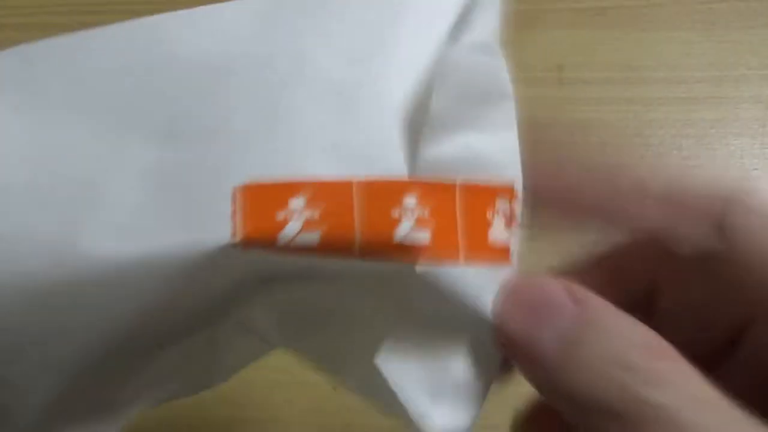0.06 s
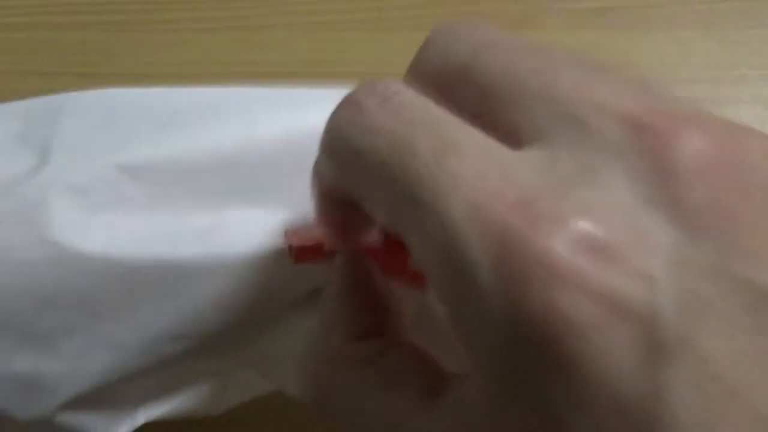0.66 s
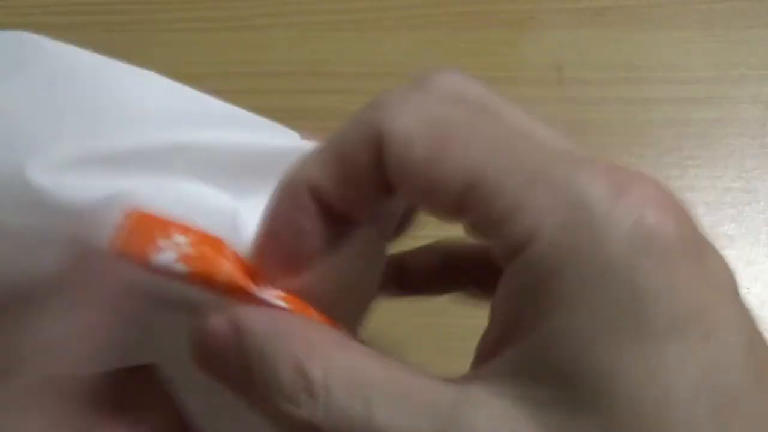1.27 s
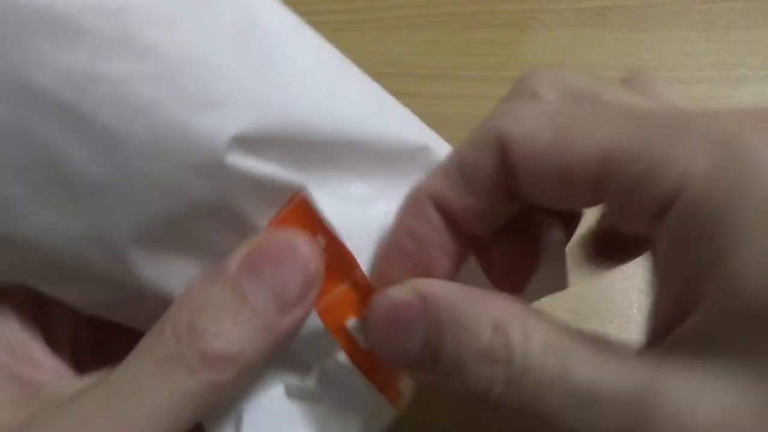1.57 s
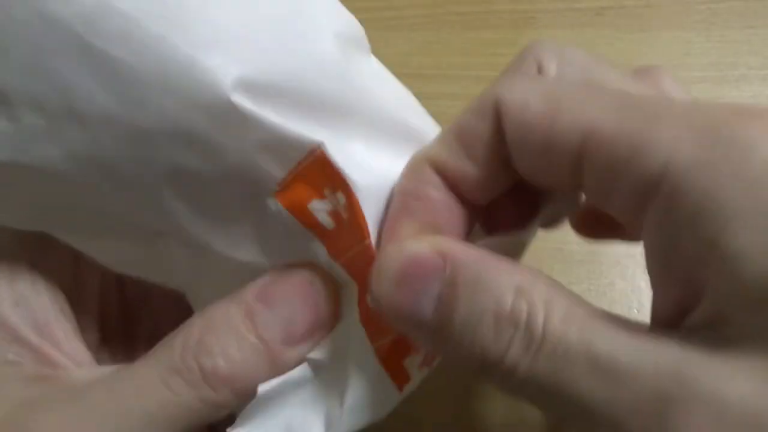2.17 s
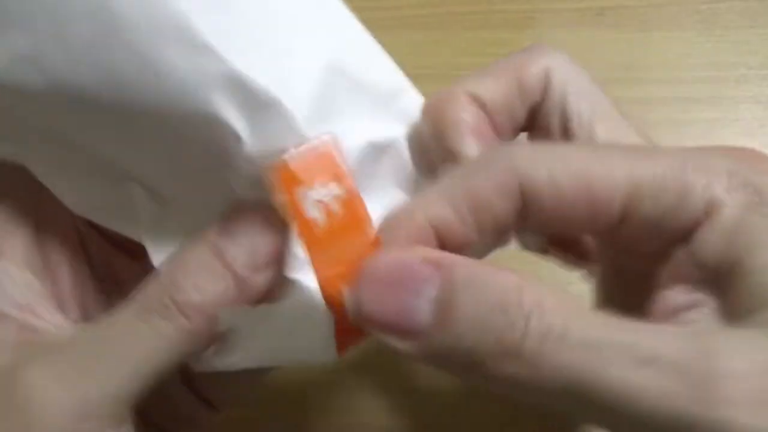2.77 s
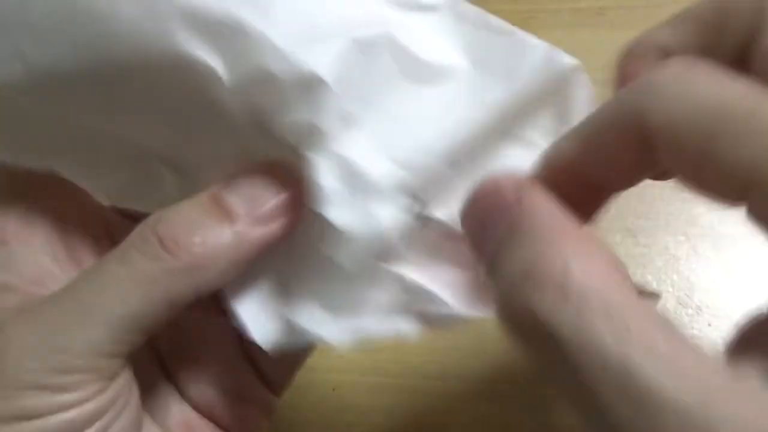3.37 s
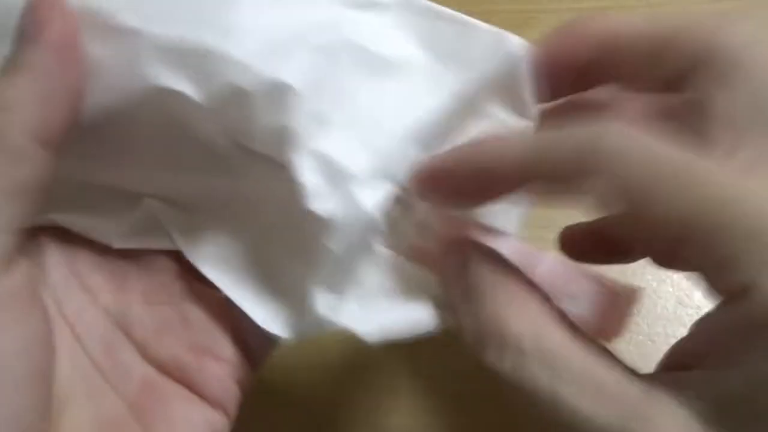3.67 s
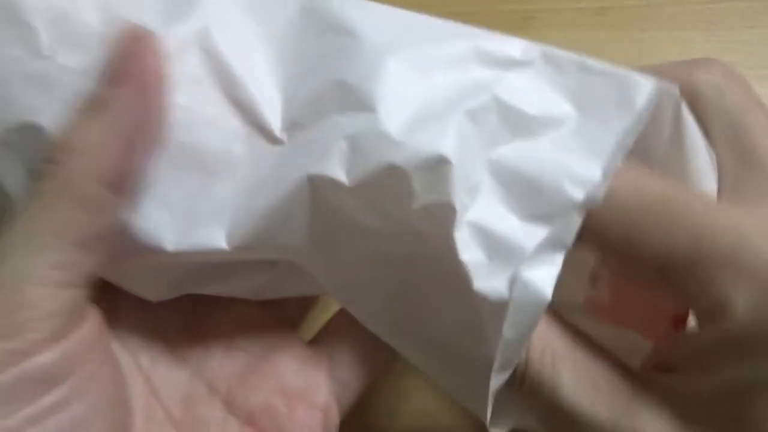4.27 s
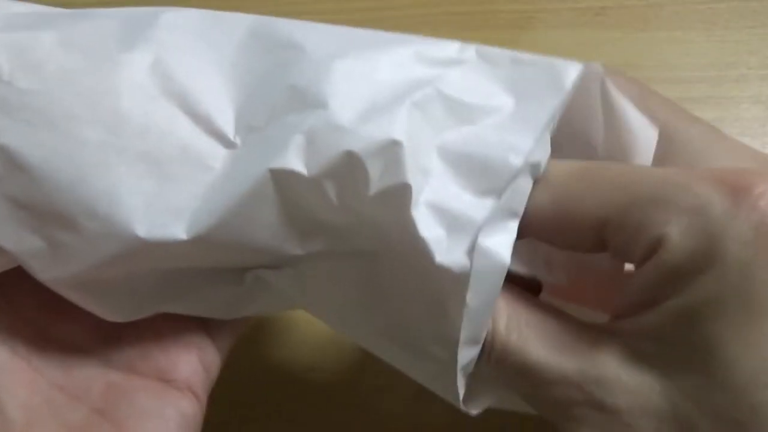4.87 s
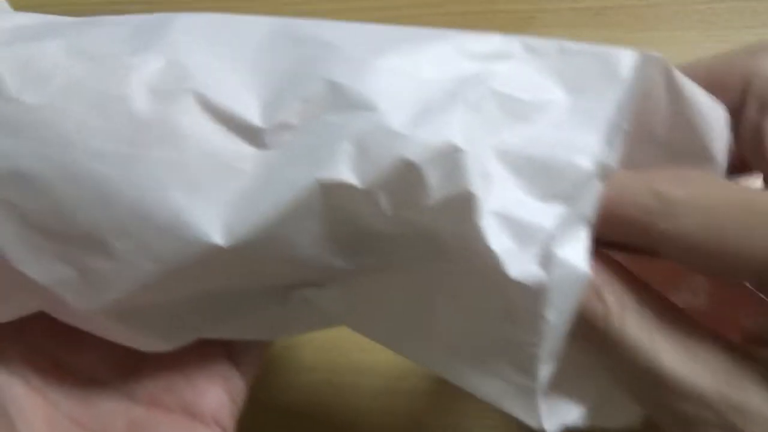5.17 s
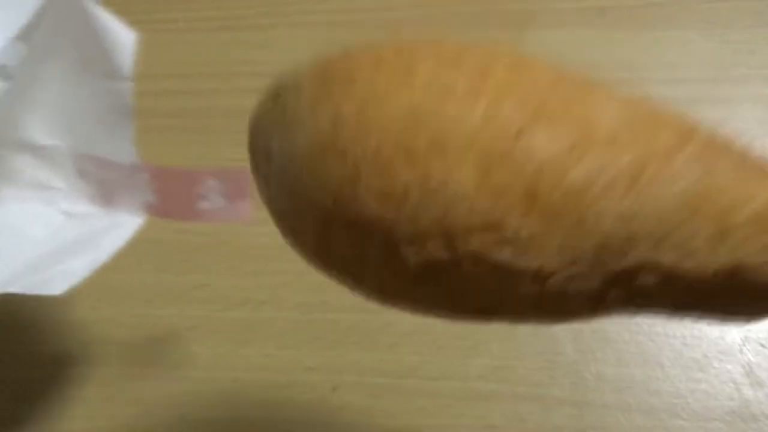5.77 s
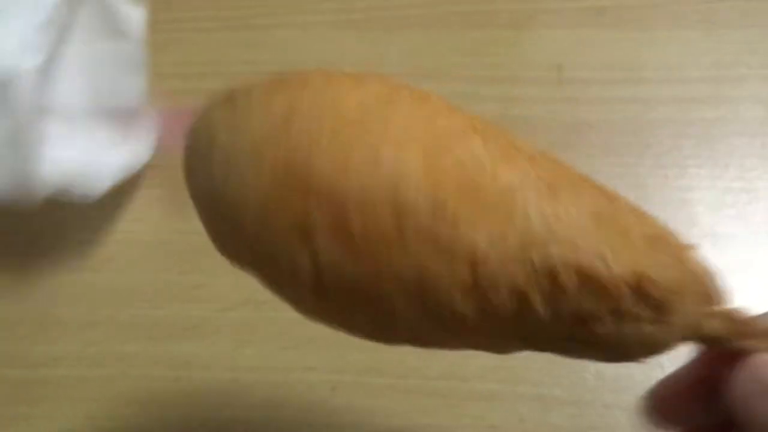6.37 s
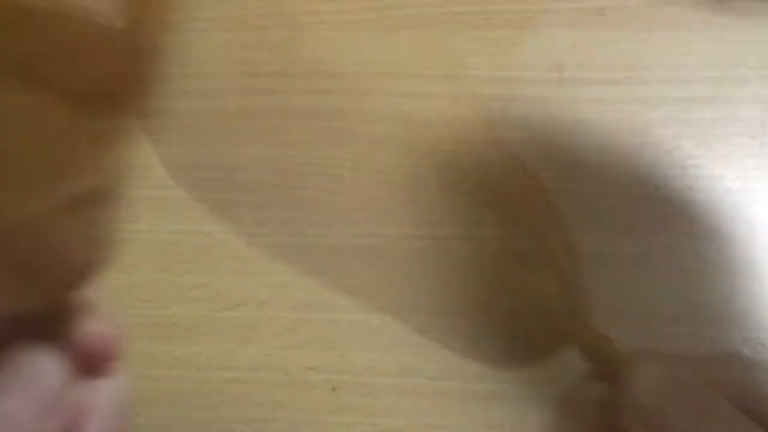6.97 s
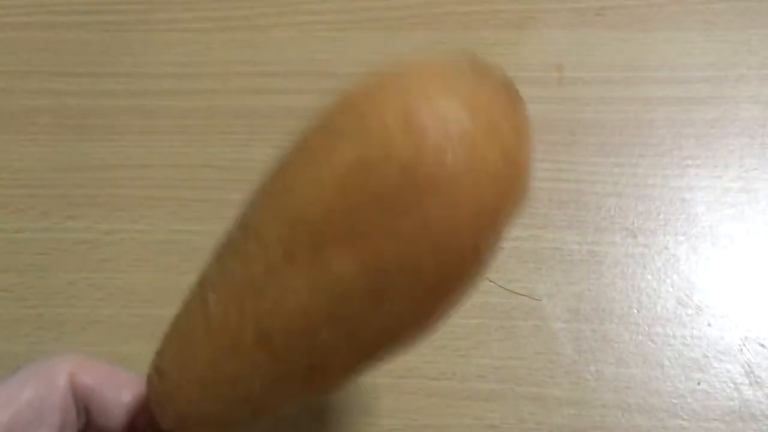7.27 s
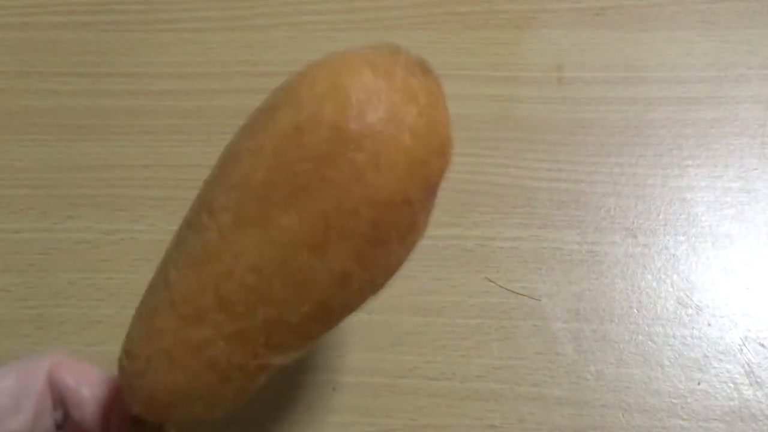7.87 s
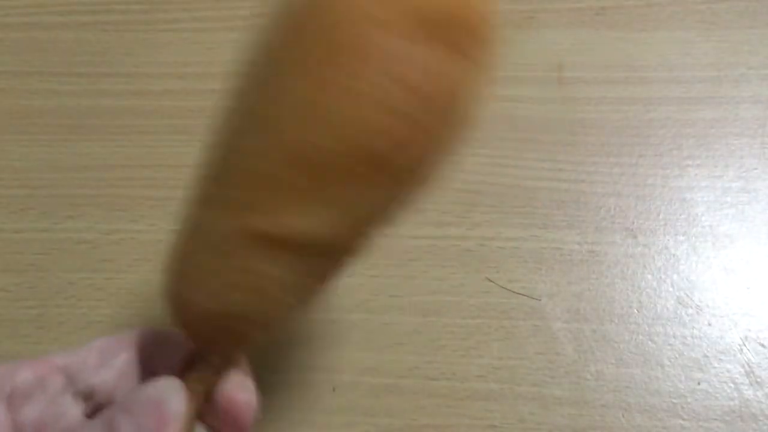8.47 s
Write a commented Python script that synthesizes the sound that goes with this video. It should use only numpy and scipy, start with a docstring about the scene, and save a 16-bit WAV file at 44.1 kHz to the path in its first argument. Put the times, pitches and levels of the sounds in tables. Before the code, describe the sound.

From the start, fingers handle a paper bag close to the microphone in a small quiet room. Uneven bursts of crackle and rubbing hiss are dotted with sharp crease snaps, loudest around 0.5 to 1.3 seconds, and the half-empty bag gives soft hollow booms. From about 2.6 to 2.9 seconds tape peels off in tiny jerks. The rustling eases briefly, then picks up near 3.6 seconds as the bag is opened. Around 4.8 to 5.2 seconds a finger stutters over the paper inside. At 5.5 seconds a snack on a stick slides out in a loud, short rush with a puff of air. The bag settles with a few ticks from 6 to 7 seconds, with a light knock on the wooden table at 6.4. Soft bumps follow near 7.3 and 8.2 seconds, while fingers shift faintly on the stick over low room rumble.

```python
"""In a small quiet room, close to a phone, fingers feel for the tape on a paper bag. Each movement stirs
crackle and hiss, creases snap one by one, and the half-empty bag booms. The tape peels off in tiny jerks,
the bag is opened, a finger stutters over the paper inside, and a snack on a stick slides out in a rush.
Then the bag settles with a few ticks, fingers shift on the stick, and a light knock and soft bumps
sound on the table."""
import sys
import numpy as np
from scipy import signal
from scipy.fft import rfft, irfft, next_fast_len
from scipy.io import wavfile
from scipy.ndimage import uniform_filter1d

SR = 44100
rng = np.random.default_rng(int(sys.argv[2]) if len(sys.argv) > 2 else 0)


def store_wav(level_fs):
    """Save 16-bit WAV to argv[1]."""
    pcm = np.round(np.clip(np.atleast_2d(level_fs), -1, 1) * 32767)
    wavfile.write(sys.argv[1], SR, pcm.T.astype(np.int16))


N = 375291
TIME = np.arange(N) / SR
TOP_HZ = 15900  # the highest pitch the phone keeps


def gain(db):
    """Turn decibels into a number to multiply by."""
    return 10 ** (np.asarray(db) / 20)


def curves(table):
    """Join a table's rows with straight lines in time, one curve for each column after the first."""
    times, *columns = np.transpose(table)
    return [np.interp(TIME, times, column) for column in columns]


def unit(x):
    """Scale a sound to an average (rms) level of 1."""
    return x / np.sqrt(np.mean(x ** 2) + 1e-20)


def burst(x):
    """Give a short sound the energy of 5 ms at level 1."""
    return x / np.sqrt(np.sum(x ** 2) / (.005 * SR) + 1e-20)


def even(x, span_s):
    """Hold the running level near 1 while keeping the fine spikes."""
    size = max(int(span_s * SR), 8)
    power = uniform_filter1d(uniform_filter1d(x ** 2, size), size)
    return x / np.sqrt(np.abs(power) + 1e-12)


def add(out, start, x):
    """Mix x into out, from start in seconds."""
    i = max(int(start * SR), 0)
    out[i:i + len(x)] += x[:max(N - i, 0)]


def band(x, low_hz, high_hz, order=2):
    """Keep the part of a sound between two pitches."""
    sos = signal.butter(order, [low_hz, min(high_hz, .48 * SR)], "band", fs=SR, output="sos")
    return signal.sosfilt(sos, x + 1e-18)


def db_at(colour, hz):
    """Look up how strong a tone colour is at a given pitch."""
    pitches, db = np.transpose(colour)
    return np.interp(np.log(hz), np.log(pitches), db)


def noise(colour):
    """Noise at level 1 with a given tone colour, falling away beyond the table's ends."""
    size = next_fast_len(N)
    hz = np.arange(size // 2 + 1) * SR / size + 1
    ends = 1 / np.sqrt((1 + (colour[0][0] / hz) ** 6) * (1 + (hz / colour[-1][0] / 2) ** 8))
    spectrum = rfft(rng.standard_normal(size)) * gain(db_at(colour, hz)) * ends
    return unit(irfft(spectrum, size)[:N])


def fade(t, t60):
    """Die away by 60 dB in t60 seconds, the fade time."""
    return np.exp(-np.log(1000) * t / t60)


def ring(t, hz, t60):
    """One tone that is struck and dies away."""
    return np.sin(2 * np.pi * hz * t) * fade(t, t60)


def wander(rate):
    """A random curve, roughly between -1 and 1, that turns rate times a second."""
    points = rng.standard_normal(int(N / SR * rate) + 2)
    return 1.2 * np.interp(TIME * rate, np.arange(len(points)), points)


# The tone colour of the quiet room. Each row: pitch in Hz, strength in dB.
ROOM_COLOUR = [(25, -3), (60, 0), (90, -0.5), (130, -7), (280, -6), (450, -18), (900, -21.5), (1600, -30.5),
               (4900, -40), (5350, -28.5), (5800, -38.5), (15000, -38)]
# How loud the background is. Each row: time in seconds, level in dB.
BACKGROUND_LEVELS = [(0, -60.5), (5.8, -68.5), (6.3, -61.5), (7.1, -59.5), (8.5, -57.5)]
def background():
    """Low room rumble, faint hiss and a thin electronic whine."""
    db, = curves(BACKGROUND_LEVELS)
    rumble = noise(ROOM_COLOUR) * gain(0.51 * wander(6.9))
    whine = np.sin(2 * np.pi * 15734 * TIME)
    return gain(db) * (rumble + gain(-19.5) * whine)


# Paper rustling while it is just held. Each row: time in seconds, level in dB.
HOLDING_LEVELS = [(0, -86), (.05, -75), (.1, -43.5), (1.4, -45.5), (2.0, -42.5), (3.2, -53), (3.32, -55),
                  (3.4, -46.5), (4.25, -53), (4.35, -52.5), (4.45, -39.5), (5.26, -48), (5.33, -61.5),
                  (5.42, -43.5), (5.75, -75), (7.9, -75.5), (8.2, -66), (8.5, -67.5)]
# The hands find the tape, lift the bag, peel, open, grope inside and move the bag aside.
# Each row: start in seconds, length in seconds, level in dB, swell from start to end in dB,
# brightness (higher means more treble), boom in dB relative to the level, share of crackle from 0 to 1.
HAND_STROKES = [ (0.063, 0.027, -39.5, 6, 3, -16, 0.77), (0.129, 0.064, -29.5, 8, 2.5, -14, 0.6),
                (0.222, 0.02, -25.5, 5.5, 1.5, -20, 0.45), (0.317, 0.055, -24, -4, 0, -8.5, 0.5),
                (0.394, 0.052, -35, 2, 4, -16, 0.8), (0.464, 0.073, -30, -2, -1, -11, 0.47),
                (0.561, 0.056, -26.5, -1.5, 1, -12.5, 0.63), (0.638, 0.036, -23.5, -4.5, 3, -18, 0.65),
                (0.746, 0.072, -24, 4, 2, -13.5, .6), (0.833, 0.098, -29, 7.5, 4.5, -11, 0.7),
                (0.978, .06, -25.5, 2.5, 2.5, -10.5, 0.16), (1.046, .07, -22, -0.5, 3.5, -18, 0.48),
                (1.153, 0.11, -34, -1, 2, -12, 0.4), (1.293, 0.018, -20.5, -9, 5, -16.5, 0.2),
                (1.342, 0.15, -30.5, -2.5, 2.5, -18.5, 0.5), (1.55, 0.089, -29, 4, 1.5, -22, 0.6),
                (1.672, 0.37, -38, -15.5, 4, -17.5, 0.96), (1.853, 0.044, -35, 0, 5, -13, .6),
                (2.008, 0.12, -33, -4.5, 4.5, -18, 0.82), (2.095, 0.12, -38, 12.5, 1.5, -23, 0.3),
                (2.29, 0.05, -38, 2, 2.5, -22, 0.6), (2.371, 0.057, -34, 12, 5, -13.5, 0.83),
                (2.477, 0.022, -27.5, -1, 1.5, -23, 0.97), (2.58, .045, -33, 2, -0.5, -20, 0.98),
                (2.656, 0.15, -27, 1, 2.5, -23, 0.55), (2.855, 0.013, -28.5, 4.5, 18, -25, 0.4),
                (2.89, 0.08, -38.5, 6, 8, -10.5, 0.4), (2.96, 0.035, -30.5, 8.5, 5.5, -22, 0.23),
                (3.055, 0.21, -38.5, -18, 2, -17, 0.75), (3.254, 0.018, -34.5, -7, 0, -31, 0.9),
                (3.345, 0.13, -40.5, 3, 4, -14, 0.33), (3.385, 0.016, -39.5, -10, -7, -6, .3),
                (3.545, 0.14, -41.5, 3, 5.5, -14, 0.1), (3.64, 0.17, -38, 2, 2, -13.5, 0.65),
                (3.787, 0.089, -31.5, 2, 3, -15.5, 0.45), (3.902, .04, -27.5, -2, 3.5, -13, 0.13),
                (3.967, .1, -28.5, -3, 1.5, -17, 0.38), (4.097, .11, -34.5, 3.5, 3, -8, 0.54),
                (4.231, 0.036, -43, 24, 0, -20, 0.94), (4.318, 0.013, -42, -5, 2, -16, 1),
                (4.376, .03, -40, -4, 3, -18, 0.4), (4.461, 0.26, -31.5, -3, 3, -16.5, 0.2),
                (4.919, 0.011, -40, -17, 11, -5, 1), (5.004, 0.035, -36.5, 3, 0, -4, 0.75),
                (5.057, 0.016, -29, 1, 6.5, -15, 0.6), (5.092, .11, -25, 2, 3.5, -19, .08),
                (5.345, 0.04, -36.5, 1, 1.5, -13.5, 0), (6.25, 0.26, -67, -1, 2, -10.5, .2),
                (6.583, .05, -60.5, 4, 8, -21, 0.4), (6.748, 0.075, -54.5, 2, 5, 0.5, 0.43),
                (6.887, 0.095, -62.5, -9.5, 7.5, 0, 0.9)]
# The snack slides out. Each row: time in seconds, level in dB, share of fast sliding from 0 to 1,
# level in dB of the air buffeting the microphone.
SNACK_PULL = [(5.425, -50.5, 0, -87), (5.478, -19.5, .5, -46.5), (5.507, -14.5, .7, -47.5),
              (5.548, -13.5, 1, -31), (5.586, -15.5, .6, -52.5), (5.618, -39.5, .4, -47.5),
              (5.72, -70, 0, -92)]
def hands(attack_s=0.0073, release_s=0.048, arch_db=1.5, creasing_db=-66):
    """Holding, pulling and strokes add up to four curves: level, brightness, boom and crackle share."""
    held_db, = curves(HOLDING_LEVELS)
    held = gain(held_db) ** 2
    pulling = (TIME > SNACK_PULL[0][0]) & (TIME < SNACK_PULL[-1][0])
    pull = pulling * gain(curves(SNACK_PULL)[0]) ** 2
    held_tone, pull_tone = [2.5, -9, 0.64], [1, -21.5, 0.28]  # brightness, boom, crackle share
    tone = np.outer(held_tone, held)
    tone[2] *= held_db > creasing_db  # a lighter touch only rubs and does not crackle
    tone += np.outer(pull_tone, pull)
    power = held + pull
    for start, length, db, swell_db, *stroke_tone in HAND_STROKES:
        near = slice(*np.searchsorted(TIME, [start - 2 * attack_s, start + length + 2 * release_s]))
        t = TIME[near] - start
        along = np.clip(t / length, 0, 1) - .5
        edges_db = 20 * (np.minimum(t, 0) / attack_s - np.maximum(t - length, 0) / release_s)
        stroke = gain(db + swell_db * along - arch_db * (2 * along) ** 2 + edges_db) ** 2
        power[near] += stroke
        tone[:, near] += np.outer(stroke_tone, stroke)
    catch_db = 0.97 * wander(90)  # the fingers catch and slip, so no movement is even
    return 10 * np.log10(power) + catch_db, *(tone / power)


# The tone colour of crackling paper. Each row: pitch in Hz, strength in dB.
CRACKLE_COLOUR = [(400, -5.5), (600, -8), (880, -4), (1400, -9), (2100, 3), (3200, -9), (4600, -1),
                  (7500, -6.5), (11000, -14.5), (15500, -12)]
def crackle(per_second=650, spread_db=10.0, focus_db=8, tail_s=0.036, tail_db=-8):
    """Countless tiny creases click, a few large among many small, each strongest near its own pitch."""
    count = int(per_second * N / SR)
    when, how_big, how_high = rng.random((count, 3)).T
    places = (when * (N - 1)).astype(int)
    sizes = gain(spread_db * np.minimum(-np.log(1 - how_big), 3))
    pitches = 600 * 24 ** how_high
    out = np.zeros(N)
    for hz in 460 * 2 ** (np.arange(11) / 2):  # half an octave apart
        octaves_away = np.minimum(np.abs(np.log2(hz / pitches)), 1.5)
        colour_db = -focus_db * octaves_away + 3 * rng.standard_normal(count)
        clicks = np.zeros(N)
        clicks[places] = sizes * gain(colour_db) * rng.choice([-1, 1], count)
        out += gain(db_at(CRACKLE_COLOUR, hz)) * band(clicks, hz / 2 ** .25, hz * 2 ** .25)
    # ripples scatter through the sheet and smear each click
    decay = np.exp(-2 * np.log(1000) / (tail_s * SR))
    smear = np.sqrt(signal.lfilter([1 - decay], [1, -decay], out ** 2)) * noise(CRACKLE_COLOUR)
    return even(out + gain(tail_db) * smear, span_s=.035)


# The tone colours of paper rubbing on paper, of fast sliding and of the bag's boom.
# Each row: pitch in Hz, strength in dB.
RUB_COLOUR = [(400, -13), (600, -6.5), (860, -1), (1400, -7), (2300, -3), (4800, -3.5), (8000, -5.5),
              (10500, -9), (12500, -14.5), (15500, -15)]
SLIDE_COLOUR = [(400, -7.5), (600, -4.5), (880, -2.5), (1400, -4.5), (2400, 0), (4500, 1.5), (8000, -1.5),
                (15500, -5.5)]
BOOM_COLOUR = [(50, -24.5), (90, -16), (150, -3.5), (235, 0), (330, -0.5), (450, -11.5)]
def rustle():
    """Crackle, rubbing hiss and boom follow the hands; fast sliding is a denser, brighter rush."""
    db, brightness, boom_db, crackling = hands()
    _, sliding, wind_db = curves(SNACK_PULL)
    crackling, sliding = np.clip(crackling, 0, 1), np.clip(sliding, 0, 1)
    hiss = unit(noise(RUB_COLOUR) * gain(3.4 * wander(420) + 1.9 * wander(70)))
    paper = np.sqrt(crackling) * crackle() + np.sqrt(1 - crackling) * hiss
    # brightness tips the balance between the lows and the highs
    lows = signal.sosfilt(signal.butter(1, 3500, fs=SR, output="sos"), paper)
    tilt = gain(1.4 * (brightness - 3.0))
    paper = (lows / tilt + (paper - lows) * tilt) / np.sqrt((tilt ** 2 + tilt ** -2) / 2)
    rush = unit(noise(SLIDE_COLOUR) * gain(2.0 * wander(900)))
    boom = unit(noise(BOOM_COLOUR) * gain(3.4 * wander(55)))
    wind = unit(band(rng.standard_normal(N), 45, 210))
    bag = np.sqrt(1 - sliding) * paper + np.sqrt(sliding) * rush + gain(boom_db) * boom
    return gain(db) * bag + gain(wind_db) * wind


# The creases that snap loudest. Each row: start in seconds, rough peak level in dB, pitch in Hz of the
# small patch of paper that rings, level in dB of the bag's flexing side.
CREASE_SNAPS = [(0.088, -24, 2320, -45.5), (0.1427, -11, 6330, -32.5), (0.1608, -9, 3000, -28.5),
                (0.19, -7, 4930, -43), (0.2088, -3.5, 4520, -34), (0.2274, -9, 3930, -35),
                (0.2325, -6, 3460, -45), (0.2373, -2.5, 4470, -33), (0.315, -11.5, 3396, -28),
                (0.3331, -6, 4300, -23), (0.3506, -4.5, 5160, -32), (0.377, -7.5, 4600, -22.5),
                (0.41, -4.5, 3110, -46), (0.4943, -6, 2920, -24.5), (0.5514, -8, 2270, -50),
                (0.571, 1, 4370, -46), (0.5796, 2.5, 4930, -29), (0.6, 2.5, 4630, -29),
                (0.6306, -6, 4630, -45), (0.6388, -6.5, 3340, -23.5), (0.6613, -2.5, 3520, -25),
                (0.6654, -4, 3274, -29), (0.6888, -12, 6250, -42), (0.7569, -6.5, 3400, -22),
                (0.7739, -3.5, 4760, -37), (0.7807, -4, 3220, -44), (0.7911, -4.5, 4100, -24),
                (0.8045, 0, 7220, -22), (0.8115, -2, 5370, -23), (0.84, -6, 8300, -36),
                (0.859, -1.5, 3530, -29), (0.9057, -3.5, 4430, -35), (0.9258, -6.5, 4100, -33),
                (0.9647, -5, 4160, -28), (0.999, 1.5, 6260, -23), (1.036, 2, 3260, -20.5),
                (1.0839, -4, 3330, -43), (1.0989, 1, 5300, -22), (1.1107, 0, 5850, -31),
                (1.1154, -4.5, 2570, -25), (1.1318, -3, 5270, -26), (1.1812, -9.5, 6560, -23.5),
                (1.1971, -10.5, 4470, -27), (1.2909, -23, 3550, -32), (1.296, -4.5, 4500, -22),
                (1.3369, -9, 2280, -46), (1.377, -6, 3450, -23.5), (1.4785, -13.5, 5900, -34),
                (1.4856, -9.5, 5030, -30), (1.5899, -11, 2620, -31.5), (1.6065, -7, 5400, -32),
                (1.6125, -8, 5600, -24.5), (1.6766, -9, 3960, -37), (1.7274, -19, 7360, -44),
                (1.7527, -6.5, 6150, -25.5), (1.7913, -7.5, 4280, -42), (1.8198, -11.5, 5750, -36),
                (1.8469, -14, 2630, -45), (1.8851, -19, 2420, -46), (1.9203, -5.5, 5760, -33),
                (1.9454, -4, 4170, -23.5), (1.9948, -17, 2500, -38), (2.024, -10.5, 2320, -28),
                (2.0452, -11, 5000, -33), (2.0784, -8.5, 4150, -51), (2.1342, -17, 3900, -25),
                (2.2005, -7, 4800, -31.5), (2.2576, -17.5, 4350, -45.5), (2.3018, -14.5, 4200, -33),
                (2.3174, -7.5, 5300, -29), (2.3341, -13.5, 6160, -36), (2.396, -11, 4490, -29),
                (2.4238, -7.5, 3560, -28.5), (2.4548, -12, 3700, -31.5), (2.5015, -3.5, 7020, -30),
                (2.5316, -11, 3700, -60), (2.601, -8, 5030, -39), (2.666, -10, 3600, -29),
                (2.6845, -7.5, 4830, -31), (2.7621, -5.5, 3500, -22), (2.7746, -5.5, 2450, -28),
                (2.786, -3.5, 6670, -21), (2.7911, -5.5, 4160, -24), (2.8643, -17, 4410, -28),
                (2.9143, -14, 8300, -52), (2.9713, -10.5, 5060, -41), (3.0217, -20.5, 2580, -31.5),
                (3.0928, -13.5, 5600, -35), (3.1665, -12, 4330, -37), (3.2375, -20.5, 3400, -50),
                (3.255, -9.5, 7520, -53), (3.387, -21.5, 6070, -32.5), (3.6586, -7.5, 4830, -35),
                (3.741, -15.5, 6110, -35), (3.7796, -6, 5940, -29), (3.8143, -8.5, 2440, -45),
                (3.8256, -6, 5650, -39), (3.904, -10.5, 3440, -32), (3.9245, -6, 2330, -31),
                (4.005, -7.5, 5660, -30), (4.0626, -2.5, 5730, -32), (4.1038, -15, 4660, -24.5),
                (4.1655, -17, 3870, -24.5), (4.1824, -12, 4500, -34), (4.2232, -2, 6570, -52),
                (4.2864, -19.5, 6200, -35), (4.3114, -18, 3530, -36), (4.321, -20, 3730, -32.5),
                (4.3963, -3.5, 6350, -26), (4.56, -5.5, 5050, -30), (4.58, -8, 5000, -29),
                (4.595, -5, 3620, -25), (4.6483, -16, 3420, -25.5), (4.683, -13.5, 5770, -27),
                (4.7148, -23, 2410, -27), (4.7286, -14.5, 2480, -23.5), (4.7499, -11, 2450, -20),
                (4.7553, -9.5, 6300, -35), (4.7652, -12.5, 4260, -28.5), (4.9397, -19, 2390, -54),
                (4.9982, -10.5, 3640, -24.5), (5.0599, -12, 2290, -30), (5.2229, -6, 5400, -20.5),
                (5.2866, -20.5, 4470, -39.5), (5.7528, -43, 7400, -74), (6.0279, -21, 3980, -57.5),
                (6.1674, -21.5, 5300, -47), (6.2083, -23, 2570, -43.5), (6.7022, -32, 2560, -45.5),
                (6.761, -27, 3820, -43), (6.8074, -37, 3990, -41), (6.8847, -44, 2730, -46.5),
                (7.821, -57.5, 2580, -63), (8.1129, -41, 7150, -60.5), (8.337, -37.5, 3230, -68)]
def snaps(ring_cycles=27, peak_over_body_db=14.5, lifted_at_s=1.25, lying_boost_db=9.5):
    """A crease creaks and flips: a patch rings, the sheet shivers, the side flexes, the air booms."""
    out, t = np.zeros(N), TIME[:2600]
    lead = int(.004 * SR)
    for start, peak_db, hz, flex_db in CREASE_SNAPS:
        flip_s, t60 = start + .001, ring_cycles / hz
        db, side_db = peak_db - peak_over_body_db, flex_db - 3
        # until it is lifted, the bag lies on the table and booms more
        air_db = side_db - 14.5 + lying_boost_db * (start < lifted_at_s)
        detune, chance = rng.standard_normal((2, 5))
        grain, shiver = rng.standard_normal((2, len(t)))
        # a patch has a cluster of short tones; small patches ring higher and die sooner
        pitches = np.minimum(hz * np.array([.55, .88, 1.0, 1.15, 1.5]) * np.exp(.05 * detune), TOP_HZ)
        sizes = gain([-8.0, -4, 4.5, -3.5, -8]) * np.sign(chance)
        tones = sum(size * ring(t, pitch, t60) for pitch, size in zip(pitches, sizes))
        patch = burst(tones * (1 - fade(t, .002)))
        scatter = grain * (fade(t, t60) + gain(-10.0) * fade(t, .03))
        sheet = burst(band(scatter, hz / 3.5, min(hz * 2.7, 12500)))
        # the fibres give way just before the flip, more so in large creases
        creak = band(grain[-lead:] * fade(t[:lead], .014)[::-1], hz / 2, hz * 1.6, order=1)
        creak_db = -9 - 7 * np.log2(hz / 4000) + 3 * chance[0]
        click = burst(ring(t, 7500, 0.0007))  # the flip itself
        side = burst(band(shiver * fade(t, 0.023), 480, 2000))
        side += gain(-4.5) * burst(ring(t, 860 * np.exp(0.21 * detune[0]), 0.013))
        air = ring(t, 245 * np.exp(0.35 * detune[2]), 0.028)
        air += gain(-10.0) * ring(t, 165 * np.exp(0.19 * detune[3]), 0.015)
        air = burst(band(air + gain(7.0) * shiver * fade(t, .025), 130, 500))
        add(out, flip_s - lead / SR, gain(db + creak_db) * creak)
        add(out, flip_s, gain(db) * (gain(-2.5) * patch + gain(-5.0) * sheet + gain(-12.5) * click))
        add(out, flip_s, gain(side_db) * burst(side))
        add(out, flip_s + .003, gain(air_db) * air)  # the air inside follows a little late
    return out


# Soft, low thumps: air in the bag as fingers press it, later bumps on the table.
# Each row: start in seconds, level in dB, pitch in Hz, fade time in seconds.
SOFT_BUMPS = [(0.246, -26, 170, 0.071), (0.315, -22, 200, 0.066), (.575, -26, 212, .06),
              (1.035, -41, 149, 0.038), (1.106, -24, 140, 0.041), (2.395, -36, 152, 0.049),
              (3.386, -32, 190, 0.053), (3.685, -38, 88.6, 0.11), (4.128, -35, 130, 0.065),
              (4.152, -30, 110.3, 0.083), (6.23, -40, 340, 0.047), (6.488, -51.5, 150, 0.062),
              (7.331, -31.5, 97.7, 0.13), (7.396, -43, 80, 0.17), (8.196, -48, 160, 0.096)]
def bumps():
    """A soft push on the bag or the table builds slowly and stirs only low tones."""
    out, t = np.zeros(N), TIME[:12000]
    for start, db, hz, t60 in SOFT_BUMPS:
        thud = ring(t, hz, t60) + 0.56 * ring(t, hz * 0.715, t60) + 1.1 * ring(t, hz * 1.9, t60 * .6)
        add(out, start, gain(db) * thud * (1 - fade(t, .015)) ** 2)
    return out


# The tape lets go of the paper in tiny jerks; later a finger stutters over the paper inside the bag.
# Each row: time in seconds, level in dB.
TAPE_PEEL = [(2.56, -51), (2.655, -48), (2.675, -34.5), (2.72, -51), (2.77, -46), (2.82, -39), (2.88, -43),
             (2.92, -68)]
FINGER_STUTTER = [(4.76, -72), (4.825, -35), (4.87, -44), (4.9, -37.5), (4.96, -50), (5.0, -42),
                  (5.05, -40), (5.12, -45), (5.25, -58)]
def stick_slip(levels, per_second, ring_hz, t60, jitter=0.18):
    """A contact sticks and slips at an uneven pace; each slip gives the paper one push."""
    out, t = np.zeros(N), TIME[:900]
    times, db = np.transpose(levels)
    start = times[0]
    for gap, size, detune in rng.standard_normal((120, 3)):
        start += np.exp(jitter * gap) / per_second
        if start < times[-1]:
            push = ring(t, ring_hz * np.exp(.16 * detune), t60) * (1 - fade(t, 0.0049))
            add(out, start, gain(np.interp(start, times, db) + 2.2 * size) * burst(push))
    return out


# Fingers shift on the stick.
# Each row: middle time in seconds, level in dB of each brush of the fingers, middle pitch in Hz.
GRIP_SHIFTS = [(6.341, -63.5, 4500), (6.491, -66, 2790), (7.715, -65.5, 9150), (8.005, -61, 2030),
               (8.15, -62, 6450), (8.341, -66.5, 2880), (8.48, -59.5, 2800)]
def grips(length_s=0.12):
    """Skin brushes the wood in short, grainy swells."""
    out, swell = np.zeros(N), np.hanning(int(length_s * SR))
    for middle, db, hz in GRIP_SHIFTS:
        brush = unit(band(rng.standard_normal(len(swell)), hz / 1.6, hz * 1.6))
        grain_db = 4.5 * wander(400)[:len(swell)]
        add(out, middle - length_s / 2, gain(db - 2 + grain_db) * swell * brush)
    return out


# The tones of the knocked wood. Each row: pitch in Hz, relative level in dB, fade time in seconds.
WOOD_TONES = [(231, -6, .08), (850, -5, .05), (1287, -5, .03), (1637, -6, .03), (1793, -2, .03)]
def knock(start_s=6.4145, level_db=-33.5):
    """A light, hard knock on the table makes a short crack and rings the wood."""
    out, t = np.zeros(N), TIME[:12000]
    wood = burst(sum(gain(db) * rng.choice([-1, 1]) * ring(t, hz, t60) for hz, db, t60 in WOOD_TONES))
    crack = burst(band(rng.standard_normal(len(t)) * fade(t, .018), 600, 2000))
    add(out, start_s, gain(level_db) * burst(.8 * wood + crack))
    return out


def room_echo(x, t60=0.21, treble_t60=0.08, echo_db=-15):
    """The table top and near walls send back a short, blurred echo."""
    t = TIME[:18000]
    low, high = rng.standard_normal((2, len(t)))
    body = band(low, 210, 4000) * fade(t, t60)
    treble = gain(2.5) * band(high, 3400, 20000) * fade(t, treble_t60)
    tail = (body + treble) * (1 - fade(t, 0.0067))
    return x + gain(echo_db) * signal.fftconvolve(x, tail / np.sqrt(np.sum(tail ** 2)))[:N]


def scene():
    """Bag, hands and table in the room, as one channel."""
    tape = stick_slip(TAPE_PEEL, per_second=250, ring_hz=936, t60=0.0085)
    finger = stick_slip(FINGER_STUTTER, per_second=99, ring_hz=503, t60=0.0064)
    handling = snaps() + rustle() + tape + finger + grips() + bumps() + knock()
    return (room_echo(handling) + background())[None]


def record(dry):
    """The phone clips the tallest snaps and cuts the highest treble."""
    treble_cut = signal.ellip(10, .2, 70, TOP_HZ, fs=SR, output="sos")
    return signal.sosfilt(treble_cut, np.clip(dry, -1, 1))


dry = scene()
out = record(dry)
store_wav(out)
```